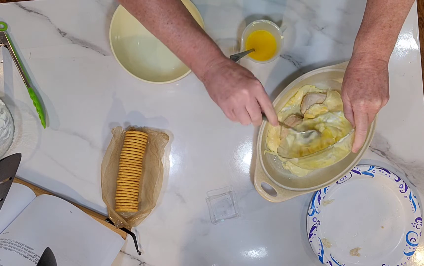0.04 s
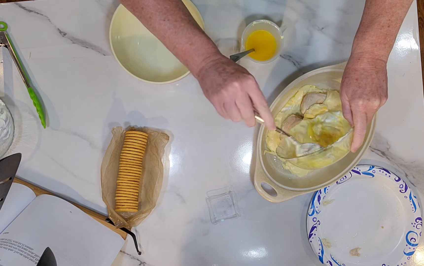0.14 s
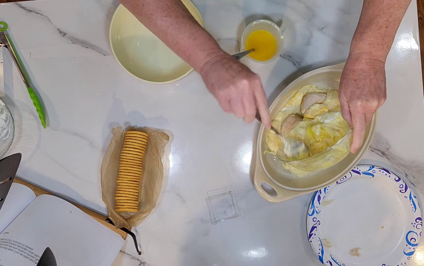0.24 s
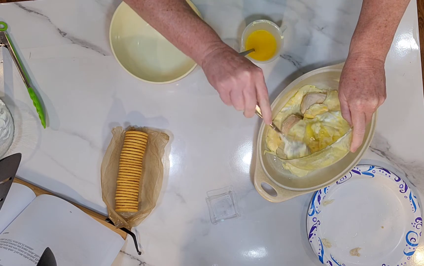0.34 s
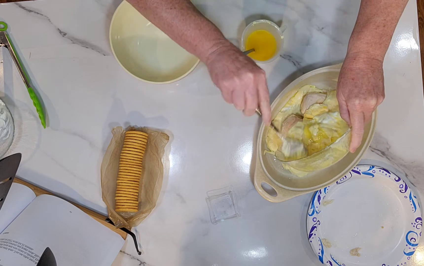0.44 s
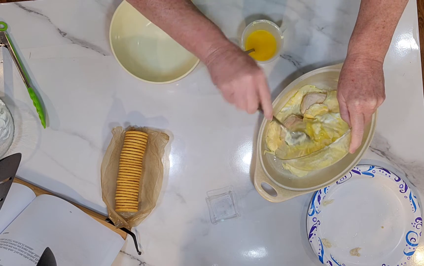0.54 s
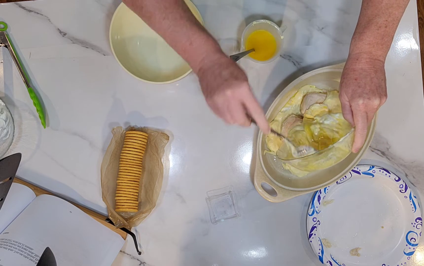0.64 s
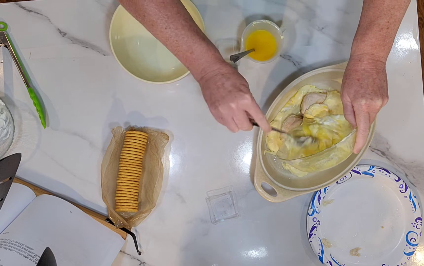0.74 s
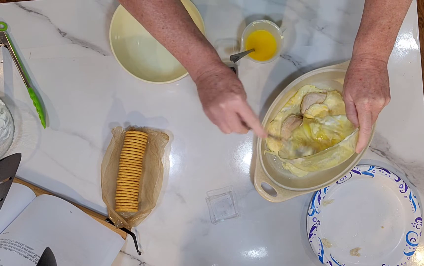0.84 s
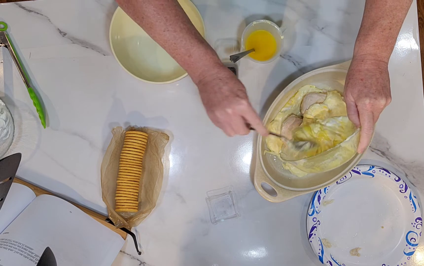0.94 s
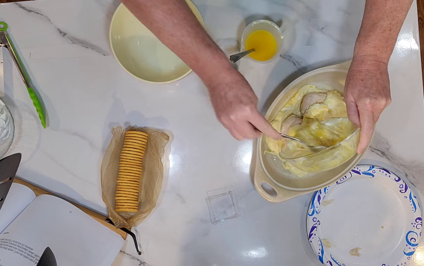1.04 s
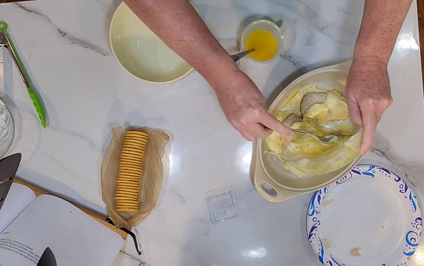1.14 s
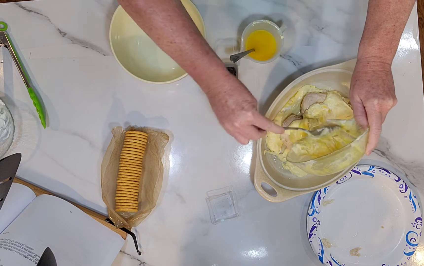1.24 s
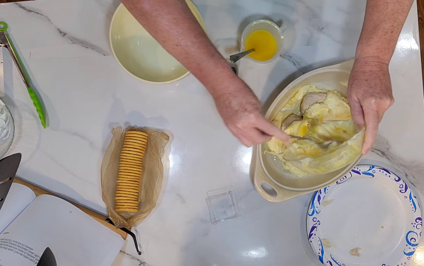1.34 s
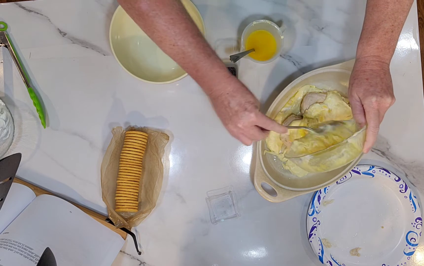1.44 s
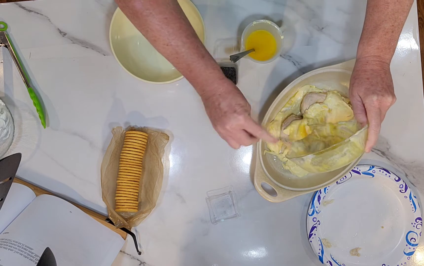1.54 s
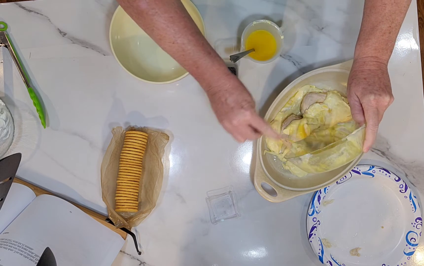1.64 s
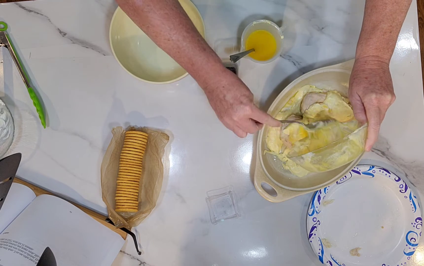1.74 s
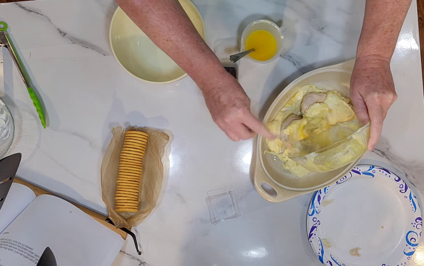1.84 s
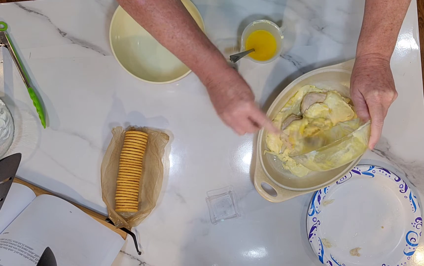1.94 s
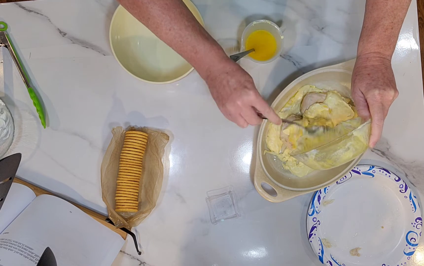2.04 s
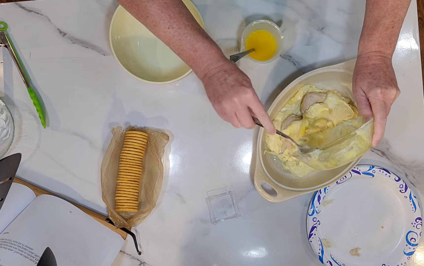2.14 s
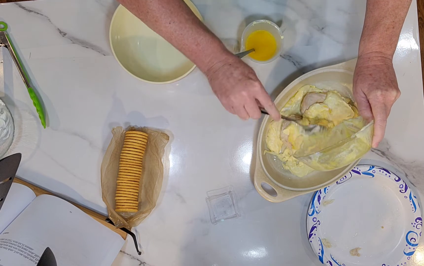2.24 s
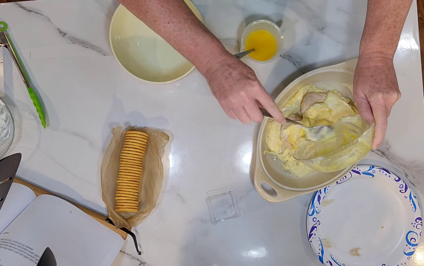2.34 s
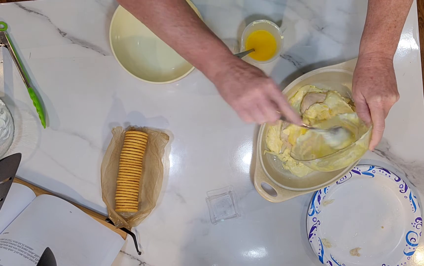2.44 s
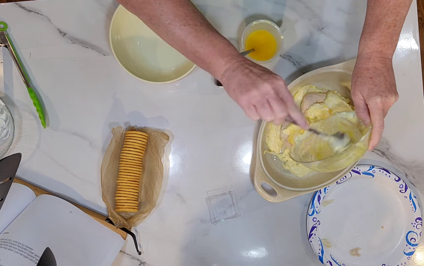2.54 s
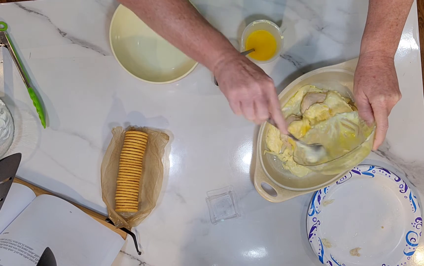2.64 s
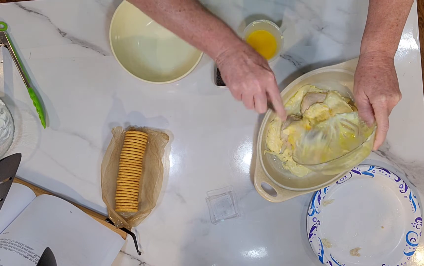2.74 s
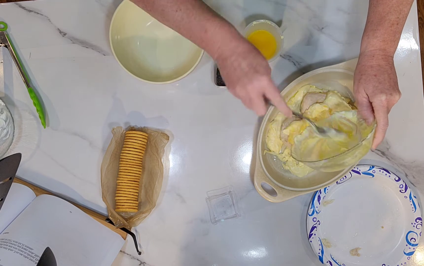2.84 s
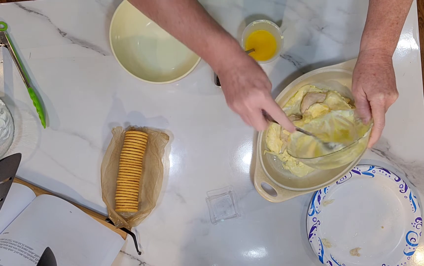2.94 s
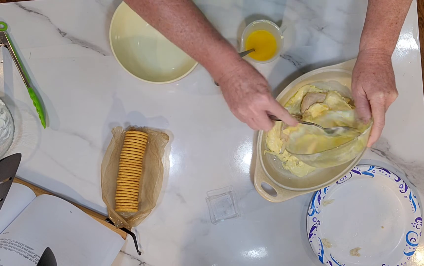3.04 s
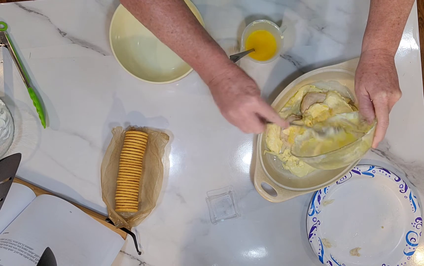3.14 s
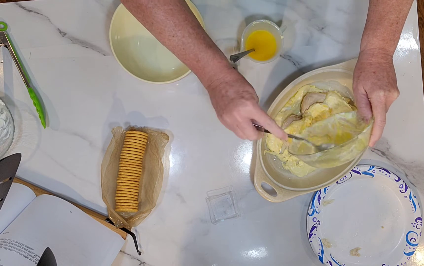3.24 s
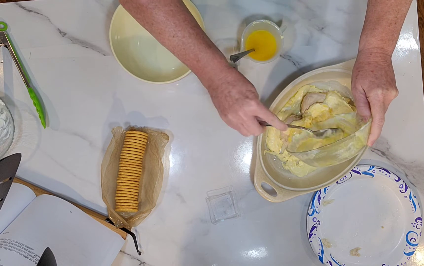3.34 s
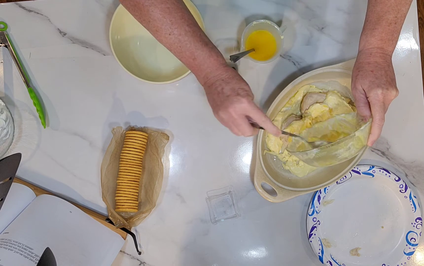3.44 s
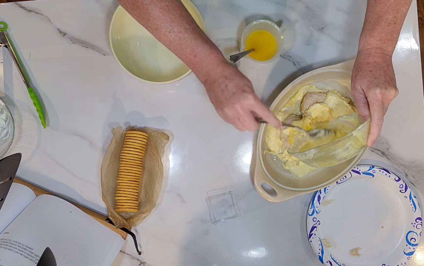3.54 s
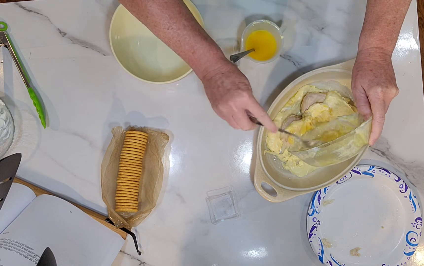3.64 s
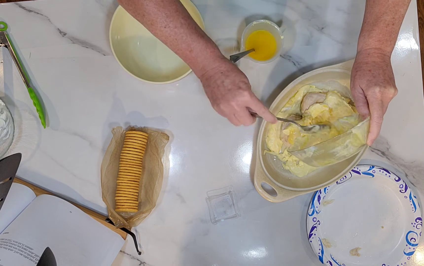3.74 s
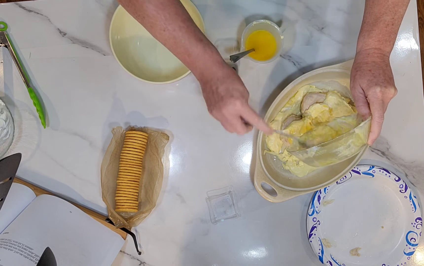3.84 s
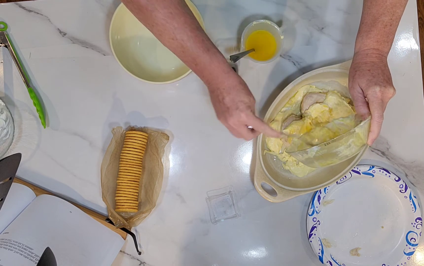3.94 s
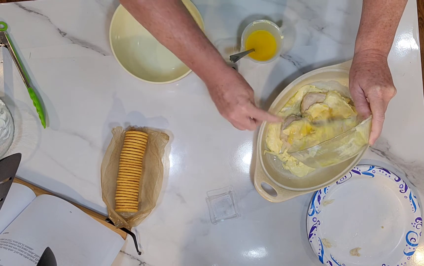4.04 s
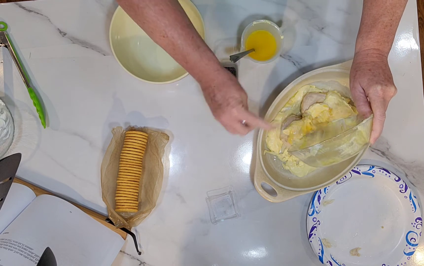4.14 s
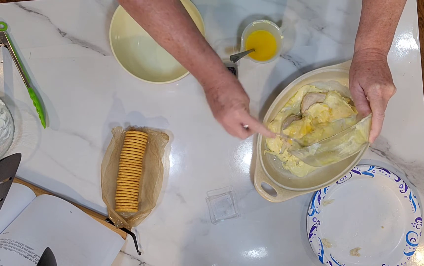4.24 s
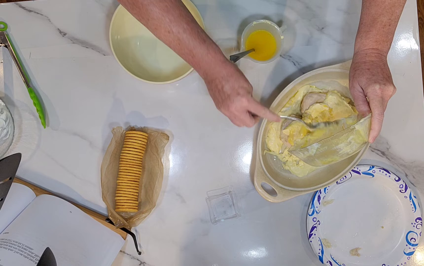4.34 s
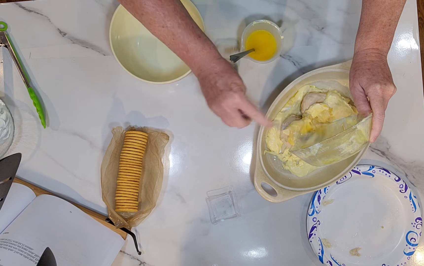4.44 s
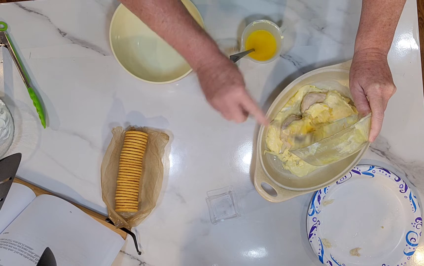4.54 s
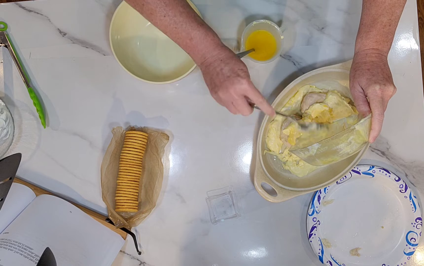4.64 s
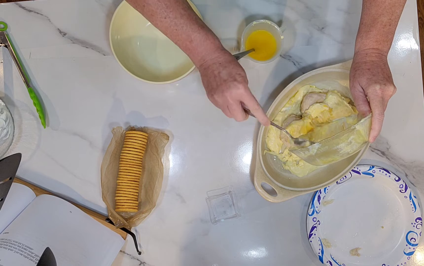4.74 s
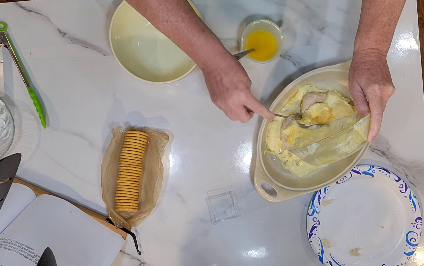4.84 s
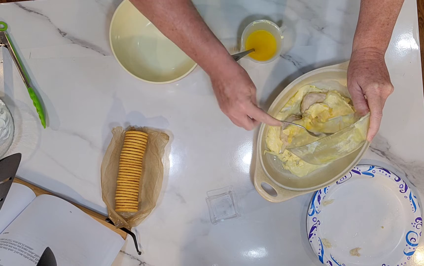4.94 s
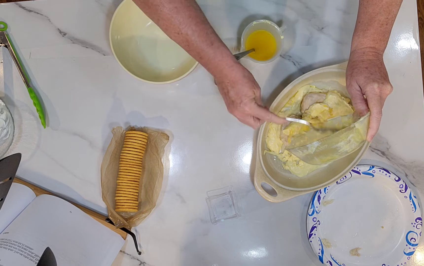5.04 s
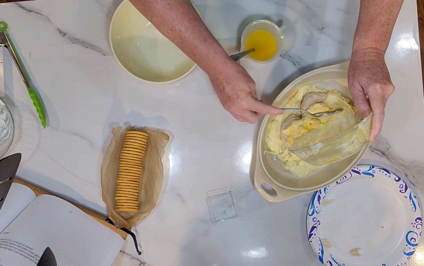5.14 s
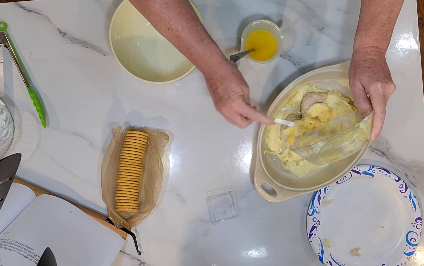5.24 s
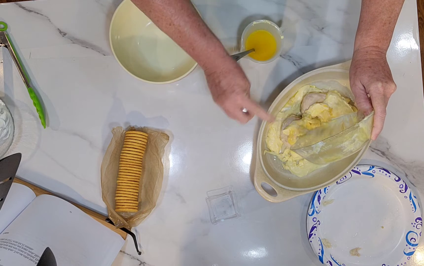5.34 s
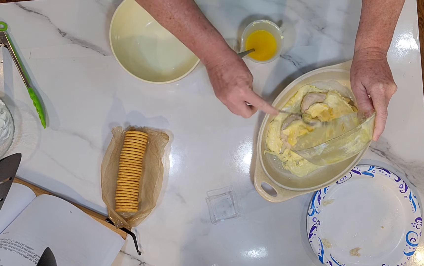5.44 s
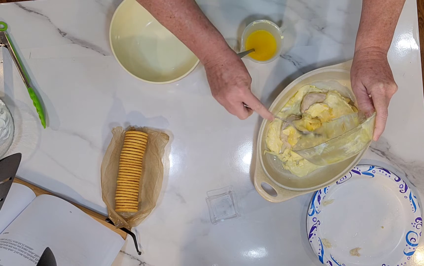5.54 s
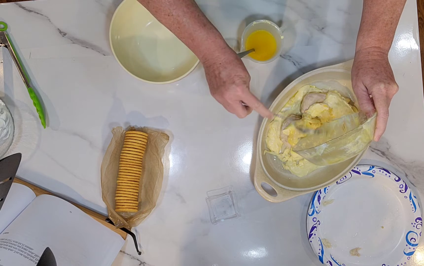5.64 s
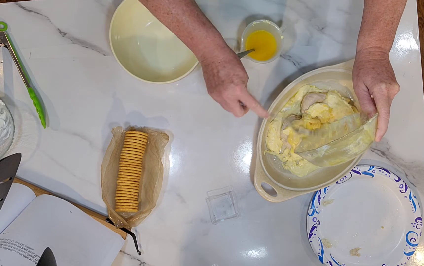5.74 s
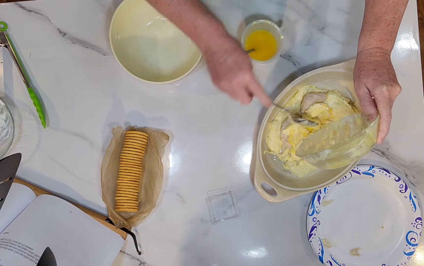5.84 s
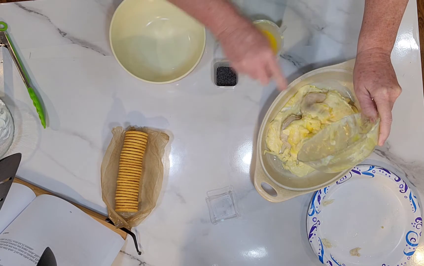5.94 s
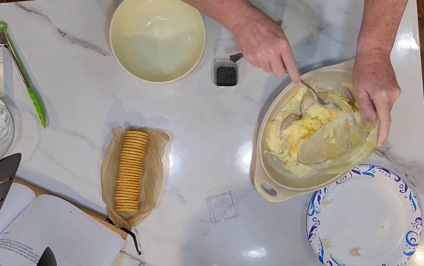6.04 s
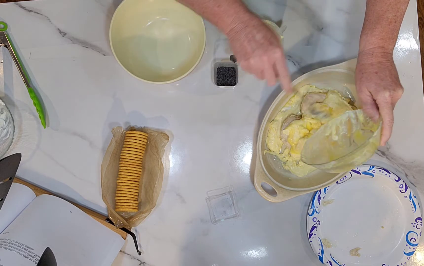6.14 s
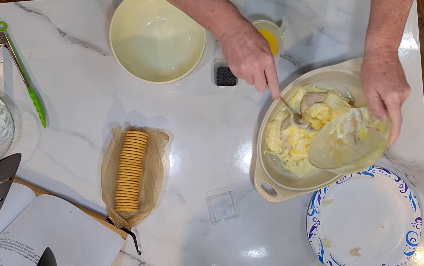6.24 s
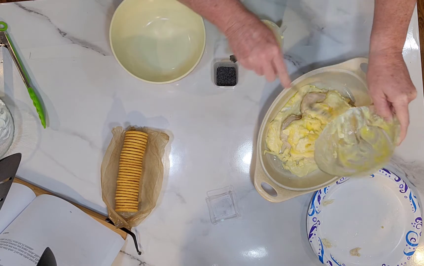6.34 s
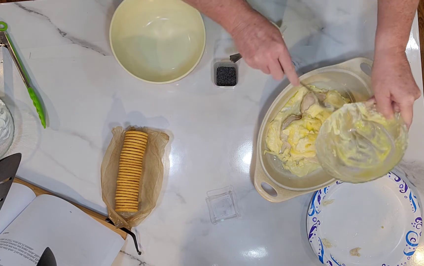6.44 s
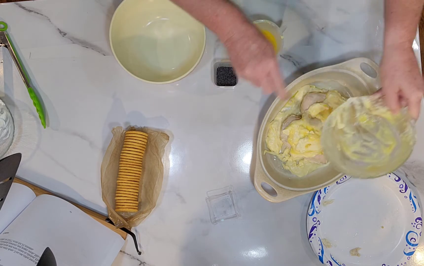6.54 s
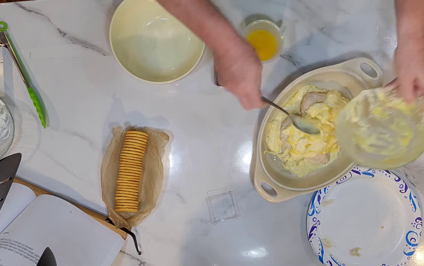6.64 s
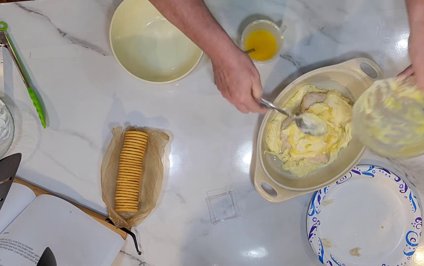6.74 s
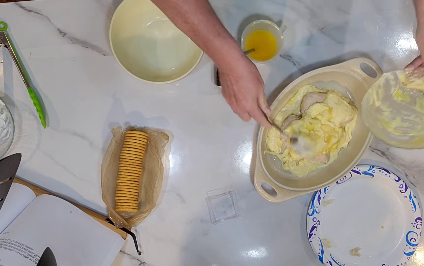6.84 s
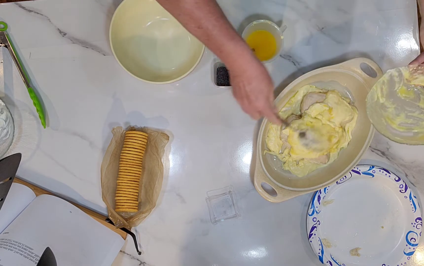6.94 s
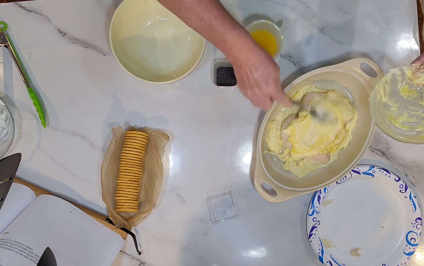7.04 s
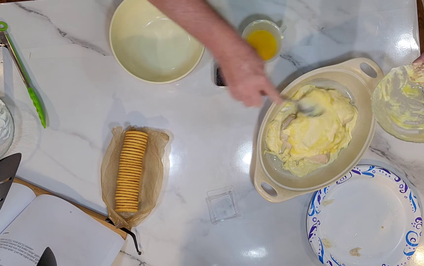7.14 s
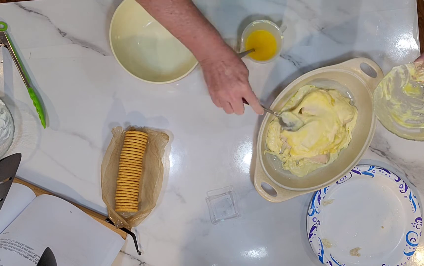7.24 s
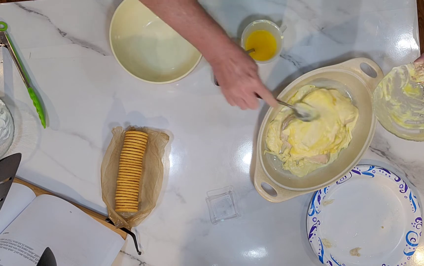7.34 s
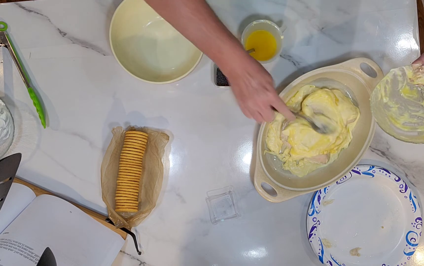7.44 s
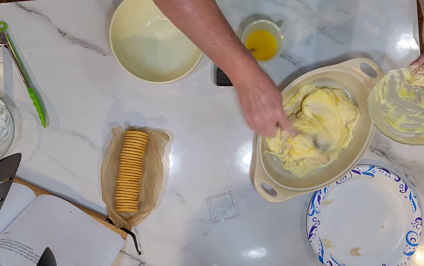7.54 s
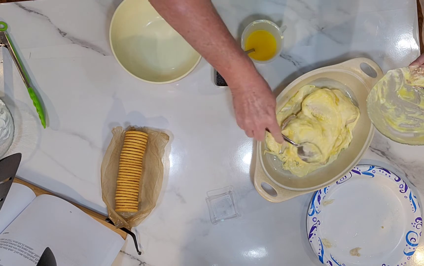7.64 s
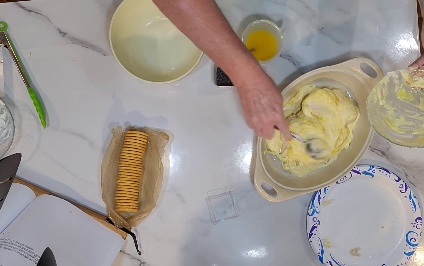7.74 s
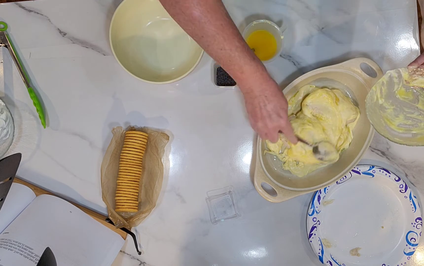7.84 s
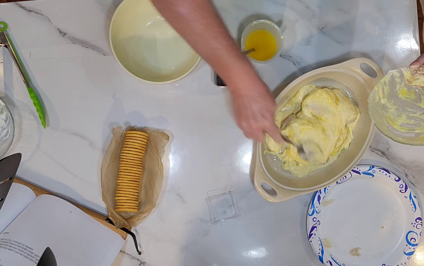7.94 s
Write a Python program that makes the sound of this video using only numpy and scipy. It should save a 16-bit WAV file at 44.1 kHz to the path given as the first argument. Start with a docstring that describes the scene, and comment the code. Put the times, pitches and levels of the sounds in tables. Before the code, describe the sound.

Quick, uneven clinks and light scrapes of a spoon in a glass bowl, ending with soft sticky sauce sounds.

```python
"""Clinks, chatter and gritty scrapes of a steel spoon in a tilted glass bowl; at the end, only sauce smacks.
Each contact is a burst of tiny blows ringing bowl and spoon, damped by thick sauce and spoon pressure.
Stick-slip grains drive the scrapes; sauce pops as it lets go of the spoon. The kitchen is small and hard,
with air noise and a far refrigerator hum. Two close microphone ports look down on the counter."""
import sys
import numpy as np
from scipy import signal
from scipy.fft import rfft, irfft, next_fast_len
from scipy.io import wavfile
from scipy.ndimage import map_coordinates

SR = 44100
rng = np.random.default_rng(int(sys.argv[2]) if len(sys.argv) > 2 else 0)


def put_to_file(sound):
    """Save the sound as 16-bit audio at rate SR, in the file named by the first command-line argument."""
    columns = np.atleast_2d(sound).T  # one column per channel
    safe = np.clip(columns, -1, 1)
    whole_steps = np.round(safe * 32767)
    wavfile.write(sys.argv[1], SR, whole_steps.astype(np.int16))


N = 352174

# Air noise spectrum. Each row: frequency in Hz, relative density in dB.
AIR_SPECTRUM_DB = [(18, -43), (30, -16.5), (71, -4), (145, -18.5), (374, -16), (721, -26.5), (801, -25),
                   (1430, -31), (1540, -34.5), (1720, -28), (16000, -52.5)]
# Air noise likeness between ports. Each row: frequency in Hz, left-right correlation.
AIR_CORRELATION = [(60, 0.93), (180, 0.92), (550, 0.82), (1650, -0.46), (4970, -0.69), (15000, 0.57)]
# Refrigerator partials. Each row: frequency in Hz, level in dB.
HUM_PARTIALS = [(60, -69.5), (120, -66.5)]
# Kitchen decay. Each row: frequency in Hz, T60 in seconds.
KITCHEN_T60_S = [(500, 0.18), (1500, 0.21), (4000, 0.27), (10000, 0.24)]
# Port phase difference. Each row: frequency in Hz, left minus right in radians.
PORT_PHASE_RAD = [(300, -3.3), (1200, -0.65), (3700, -1.27), (8000, -1.53), (15000, -1.7)]
# Port level difference. Each row: frequency in Hz, left minus right in dB.
PORT_BALANCE_DB = [(500, -2), (2000, -0.7), (5000, -1.5), (9000, 1), (15000, 2.5)]
# Sauce letting go. Each row: start in seconds, level in dB, 5 kHz weight in dB, 12 kHz weight in dB.
SMACKS = [(0.3086, -23.5, -13, -22), (1.8101, -44, -13, -6), (1.8687, -47, -1, -19.5),
          (6.9134, -31.5, -22, -12.5), (7.0788, -30.5, -3, -15.5), (7.3826, -46, -16.5, -4),
          (7.5029, -45.5, -12, -19), (7.5442, -45, 4, -14), (7.565, -50, -24, -15.5)]
# Sauce-damped glass bowl. Each row: mode frequency in Hz, level in dB, T60 in seconds.
BOWL_MODES = [(870, -13.5, 0.14), (958, 12, 0.079), (1069, 5.5, 0.037), (1522, -6.5, 0.17),
              (1695, -3.5, 0.16), (2050, -12.5, 0.066), (2124, -2.5, 0.088), (2286, -7.5, 0.18),
              (2511, -18.5, .09), (2849, -3, 0.14), (3130, -6, 0.3), (3470, 2, 0.086), (4226, -4.5, 0.69),
              (4706, -1.5, 0.025), (5090, -3, 0.16), (5490, 1, 0.098), (5870, 0.5, 0.45), (6060, -6.5, 0.3),
              (6860, 0.5, 0.22), (7685, -1, 0.25), (8330, -9, 0.12), (9130, 7.5, 0.1), (10510, -10.5, 0.12),
              (10120, 4.5, 0.13), (12080, 3, 0.066), (12900, 4, 0.11), (12407, 2.5, 0.057),
              (14300, -0.5, .05), (15500, -7, .04)]
# Soft scrapes. Each row: middle in seconds, length in seconds, bowl, spoon and rasp levels in dB.
SCRAPES = [(.04, 0.18, -52.5, -55, -65), (0.527, .06, -59, -83, -57), (1.043, 0.14, -66, -56, -49),
           (1.31, 0.22, -59.5, -56, -60), (1.73, 0.046, -64, -64, -79), (1.872, 0.11, -57, -58, -63),
           (2.323, 0.036, -53, -53, -41), (2.381, 0.035, -33, -62, -67), (2.83, 0.081, -57, -74, -55.5),
           (2.912, .07, -59, -66, -66), (3.177, 0.2, -53, -46.5, -80), (3.586, 0.24, -81, -57, -65),
           (3.859, 0.078, -43, -34.5, -41), (4.03, 0.085, -54, -57, -57), (4.187, 0.17, -63, -78, -53.5),
           (4.464, 0.19, -50.5, -66, -52), (4.896, 0.077, -56, -72, -57), (5.17, 0.16, -70, -61, -59),
           (5.272, .08, -58, -65, -51.5), (5.722, 0.044, -62, -54, -47), (5.885, .05, -52, -47, -48)]
# Slide after a contact: bowl, spoon and rasp offsets in dB from that contact's bowl, ring and edge levels.
SLIDE_OFFSETS_DB = [-35.5, -31, -34.5]
# Contact colour breakpoints in Hz: low thud, thud, body, clink, edge.
COLOUR_HZ = [600, 900, 2200, 5800, 11000]
# Spoon on bowl. Each row: time in seconds, level in dB, spoon ring in Hz, relative ring, thud, clink
# and edge levels in dB, pressure damping in 1/s, left minus right in dB, favoured body and clink in Hz.
CONTACTS = [(0.0004, -49, 3530, 5.5, -22, -6, -18, 12, -3, 2850, 4670),
            (0.0734, -39.5, 3700, 3, -18, -4.5, -5.5, 22, -0.5, 1670, 5680),
            (0.1404, -60.5, 3692, 22, -34, 4, -3, 9.2, 1.5, 3100, 5000),
            (0.1555, -56, 3780, 16, -20, -3, -1.5, 15, 4, 3220, 5150),
            (0.3536, -29.5, 3600, -11, -14, -3, -10, 19, 2, 3070, 6200),
            (0.4119, -28, 3636, -0.5, -13, 1, -7, 23, 1.5, 2100, 4590),
            (0.5327, -28, 3690, -0.5, -23, 5, -2, 28, 5.5, 3280, 5360),
            (0.6312, -31, 3665, -10.5, -5.5, -7.5, -30, 16, 1, 2700, 5300),
            (0.853, -29, 3656, 11, -15, 1.5, -6.5, 24, 1.5, 3240, 5770),
            (0.8574, -33, 3400, -4, -13.5, -6.5, -4.5, 14, -0.5, 3100, 6750),
            (0.9131, -13.5, 3970, -8.5, -19.5, -5, -15.5, 30, 3, 2230, 5200),
            (1.0318, -35, 3710, 11, -8, -14, -8.5, 21, -0.5, 3330, 6900),
            (1.0874, -24, 3850, -5.5, -7.5, -1.5, -5, 20, 0.5, 1590, 7110),
            (1.2226, -45.5, 3890, 13, -10, -9.5, -13, 29, 2, 3170, 5020),
            (1.5433, -24, 3760, 8, -10, -6.5, -6, 21, 4, 1646, 7000),
            (1.5548, -36.5, 4145, 7, -9, -3, -13, 16, -13.5, 2170, 4730),
            (1.6264, -54, 3945, 20.5, -19, -14, -19.5, 15, 0, 1910, 4740),
            (1.7474, -47, 3730, 5, -18, -4, -15.5, 14, 2.5, 2290, 4440),
            (1.8877, -48, 3500, -13.5, -32, -10, -10.5, 12, -0.5, 2150, 5660),
            (2.0493, -25.5, 3900, 6, -13.5, -1.5, -9, 18, 1.5, 1980, 5300),
            (2.085, -27.5, 3780, -7, -13.5, -11.5, -17.5, 6.4, 1, 2820, 6200),
            (2.1164, -32, 3730, 0, -2.5, -20, -25, 35, 0, 3250, 4470),
            (2.1265, -33.5, 3820, -1, -18, -8, -19.5, 5.5, 1.5, 2270, 4730),
            (2.3188, -19.5, 3754, -10.5, -19, -5, -9.5, 24, 0.5, 3350, 6100),
            (2.3875, -28, 4000, -11, -18, -12, -22, 12, 1.0, 2130, 4840),
            (2.4069, -26, 4030, -18, -28.5, -9, -23, 15, -2, 2166, 5250),
            (2.6727, -26.5, 3910, 5.5, -35, -14, -4, 13, 2.5, 2020, 5260),
            (2.681, -59, 3860, 10, -22, -6, 8, 19, 3, 2780, 4600),
            (2.7571, -45.5, 3870, -4, -7, 5.5, -12, 15, 1, 3280, 4580),
            (2.8391, -37, 3970, -1, -12.5, -2, -28, 7.7, 1, 2100, 5700),
            (2.8656, -30, 4000, -13, -52, -20, -32, 6.8, 0, 2770, 5800),
            (2.8942, -29, 3880, -12.5, -49, -19, -32, 5, -0.5, 2250, 4510),
            (2.9143, -34, 3830, -19, -47, -27, -35, 7.9, -11, 2280, 6840),
            (3.1123, -22, 3860, -5.5, -19, -10.5, -11, 25, 2.5, 1850, 5140),
            (3.2037, -54, 3840, 7, -11.5, -5, -4, 18, -3, 3300, 6240),
            (3.3978, -30, 3807, 7, -6, 4, 0, 25, 2.5, 3250, 7040),
            (3.4715, -45.5, 3800, -2, -7, 6.5, -13, 13, 1.5, 2720, 6800),
            (3.618, -30, 3906, 4.5, -9.5, -5, -10, 31, 1.5, 2610, 6900),
            (3.681, -15.5, 3830, -15.5, -15.5, -4, -9.5, 31, 2.5, 2825, 5460),
            (3.8525, -17.5, 3695, -8, -6.5, -0.5, -7, 29, -0.5, 1580, 5940),
            (4.0442, -29, 3763, 5.5, -16, -7, -10, 23, 3, 2000, 6900),
            (4.366, -23, 3730, -5, -11, -9.5, -9.5, 45, 3, 2700, 5830),
            (4.4588, -44.5, 3670, -12, -2, -7, -31, 16, -1, 3230, 5550),
            (4.6491, -20.5, 3760, -4.5, -18.5, -3.5, -8, 31, 2, 1700, 7700),
            (4.7262, -33, 3990, -9, -14, 3, -20, 9.5, -0.5, 2340, 6080),
            (4.7329, -28.5, 3825, -10, -18, -5, -21, 10, 3, 2220, 4730),
            (4.7488, -28.5, 3930, -17, -15.5, -10, -14.5, 19, -3, 2220, 5700),
            (4.9167, -24.5, 3900, -12, -14, -2, -6.5, 22, 0.0, 1730, 5900),
            (4.9607, -28.5, 4000, -11, -11, -8, -17.5, 11, 4, 2280, 4830),
            (4.9756, -23.5, 3880, -15, -16, -4, -16.5, 12, 1.5, 2290, 7720),
            (5.1721, -23.5, 4062, -5, -18, -4.5, -6, 16, 2.5, 2380, 5100),
            (5.4674, -23, 3970, -17.5, -6.5, 0, -5.5, 17, 2, 3050, 5980),
            (5.5207, -32.5, 3990, -8, -6, 0.5, -11, 11, 0, 3390, 6200),
            (5.5498, -31, 3960, -18.5, -28, -15, -19, 7.1, -4.5, 2840, 5830),
            (5.7207, -17.5, 3980, -12.5, -10, 0, -9, 19, 0, 3200, 5750),
            (5.8944, -22.5, 3720, -12.5, -10.5, 1, -5, 20, 1, 3210, 5670),
            (6.2752, -30.5, 3910, -1.5, -8.5, -0.5, 5, 15, 2, 2885, 6120),
            (6.337, -37, 3900, -6, -13, -3, -10.5, 15, 3, 2100, 4850),
            (6.356, -37, 3983, 1, -7.5, -6.5, -5.5, 11, 1.5, 2040, 6000),
            (6.6363, -22, 3570, -12, -11.5, 1, -1, 27, 2, 3140, 6910),
            (6.6892, -28.5, 3650, -11.5, -7, -1.5, -9.5, 24, -1, 1680, 5860)]

AIR_DB, TOP_HZ = -58, 16979
SLIDE_RISE_S, SLIDE_FADE_S = .04, 0.23
CHATTER_S, MODE_SCATTER_DB, FAVOURED_WIDTH = .0022, 2.8, .045  # width as a share of pitch
LINGER_DB, EMPTYING_DB_PER_S = -46, 4.5  # ring escaping the spoon's damping; grows as the sauce leaves
LINGER_BLUR_HZ = 25  # clinging sauce unsettles the lingering pitch


def amp(db):
    """dB to gain."""
    return 10 ** (np.asarray(db) / 20)


def unit_rms(x):
    """Scale to rms 1."""
    return x / np.sqrt(np.mean(x ** 2) + 1e-20)


def along(points, hz):
    """Interpolate (Hz, value) points on a log axis."""
    knots_hz, values = np.transpose(points)
    return np.interp(np.log(hz + 1), np.log(knots_hz + 1), values)


def wobble(rate_hz):
    """Smooth random curve through rate_hz knots a second."""
    return map_coordinates(rng.standard_normal(int(N * rate_hz / SR) + 4), [np.arange(N) * rate_hz / SR])


def filtered(x, response):
    """Apply a complex frequency response."""
    size = next_fast_len(N + SR // 2)
    return irfft(rfft(x, size) * response(np.fft.rfftfreq(size, 1 / SR)), size)[..., :N]


def ringing(t, hz, db, t60_s, blur_hz=0):
    """Sum of decaying sines; blur random-walks each phase."""
    phase = 2 * np.pi * hz[:, None] * t
    if blur_hz:
        phase += np.cumsum(rng.standard_normal(phase.shape), axis=1) * np.sqrt(2 * np.pi * blur_hz / SR)
    return np.sum(amp(db[:, None] - 60 * t / t60_s[:, None]) * np.sin(phase), axis=0)


def add(track, start_s, sound):
    """Mix a sound into the track."""
    track[..., round(start_s * SR):][..., :sound.shape[-1]] += sound


def air_noise():
    """Steady room air, near mono in the bass."""
    def mid_side_gains(hz):
        angle = np.arccos(np.clip(along(AIR_CORRELATION, hz), -1, 1)) / 2
        return amp(along(AIR_SPECTRUM_DB, hz)) * [np.cos(angle), np.sin(angle)]
    mid, side = filtered(rng.standard_normal((2, N)), mid_side_gains)
    return amp(AIR_DB) * unit_rms(np.array([mid + side, mid - side]))


def refrigerator():
    """Far mains hum, wavering in level and phase."""
    t = np.arange(N) / SR
    return sum(np.sqrt(2) * amp(db + 0.57 * wobble(1.4)) * np.sin(2 * np.pi * hz * t + 0.59 * wobble(4))
               for hz, db in HUM_PARTIALS)


def kitchen(sound, wet_db, pan_db=0):
    """Direct sound on both ports plus a fresh diffuse tail with frequency-dependent decay."""
    hz, t, spectra = signal.stft(rng.standard_normal((2, SR // 2)), SR, nperseg=256)
    tail = signal.istft(spectra * amp(-60 * t / along(KITCHEN_T60_S, hz)[:, None]), SR, nperseg=256)[1]
    delayed = np.pad(sound, (130, 0))
    out = amp(wet_db) * signal.fftconvolve(delayed[None], tail / np.linalg.norm(tail[0]), axes=1)
    out[:, :len(sound)] += sound * amp([[pan_db / 2], [-pan_db / 2]])
    return out


def sauce_smacks():
    """Sticky sauce pops off the spoon: one thin bright click each time."""
    out, t = np.zeros((2, N + SR)), np.arange(256) / SR
    hz = np.fft.rfftfreq(len(t), 1 / SR)
    for start_s, level_db, low_db, high_db in SMACKS:
        spectrum = amp(along([(2500, low_db - 24), (5000, low_db), (12000, high_db)], hz))
        burst = rng.standard_normal(len(t)) * amp(-60 * np.abs(t - .002) / 0.00046)
        pop = irfft(rfft(burst) * spectrum)
        add(out, start_s, kitchen(amp(level_db) * pop / np.abs(pop).max(), wet_db=-3))
    return out[:, :N]


def drag_gains():
    """Bowl, spoon and rasp gains: the edge slides on and lifts after each contact; each scrape is a hump."""
    t, power = np.arange(N) / SR, np.zeros((3, N))
    for time_s, level_db, _, ring_db, _, _, edge_db, *_ in CONTACTS:
        after_s = np.maximum(t - time_s, 0)
        swell = (1 - np.exp(-after_s / SLIDE_RISE_S)) * np.exp(-(after_s / SLIDE_FADE_S) ** 2)
        power += (amp(level_db + np.add(SLIDE_OFFSETS_DB, [0, ring_db, edge_db]))[:, None] * swell) ** 2
    for middle_s, length_s, *levels_db in SCRAPES:
        hump = np.exp(-2 * ((t - middle_s) / (length_s / 2)) ** 2)
        power += (amp(levels_db)[:, None] * hump) ** 2
    return np.sqrt(power)


def spoon_drag():
    """Stick-slip grains drive the edge-damped bowl modes, the spoon's ring and a broad rasp."""
    t = np.arange(SR // 8) / SR
    bowl_hz, bowl_db, bowl_t60_s = np.transpose(BOWL_MODES)
    grit = rng.standard_normal((3, 2, N)) * amp(3 * wobble(90) + 2.5 * wobble(300))
    grit = 1.2 * grit[:, :1] + 0.34 * grit  # mostly common to both ports
    bowl = ringing(t, bowl_hz, bowl_db - 9 * np.abs(np.log2(bowl_hz / 2200)), 0.1 * bowl_t60_s)
    spoon = ringing(t, np.array([3890, 3700]), np.array([0, -6]), np.array([.09, .05]))
    rasp = ringing(t, np.array([5800, 9500, 13500]), np.array([0, -3, -4]), np.array([.0015, .001, .001]))
    return sum(gain * unit_rms(signal.fftconvolve(grains, body[None], axes=1)[:, :N])
               for gain, grains, body in zip(drag_gains(), grit, [bowl, spoon, rasp]))


def chatter(t):
    """Tiny blows as a contact builds up and lets go; whitened, unit energy."""
    age = t / CHATTER_S
    blows = rng.standard_normal(len(t)) ** 3 * age * np.exp(-age)
    whitened = irfft(np.exp(1j * np.angle(rfft(blows))), len(t)) * np.exp(-age / 4)
    return whitened / np.linalg.norm(whitened)


def clack(t, colour_db):
    """Countless small modes blur into fast-dying noise."""
    spectrum = amp(along(colour_db, np.fft.rfftfreq(len(t), 1 / SR)))
    noise = irfft(rfft(rng.standard_normal(len(t))) * spectrum, len(t))
    return (amp(9.5 - 60 * t / 0.034) + amp(17.5 - 60 * t / 0.0026)) * noise


def spoon_contacts():
    """Chatter rings bowl and spoon; where it lands sets which modes speak, pressure damps them."""
    out, t = np.zeros((2, N + SR)), np.arange(SR // 4) / SR
    chatter_t = t[:SR // 20]
    bowl_hz, bowl_db, bowl_t60_s = np.transpose(BOWL_MODES)
    t60_s = np.append(bowl_t60_s, [.3, .06])  # bowl modes, then two spoon modes
    for (time_s, level_db, ring_hz, ring_db, thud_db, clink_db, edge_db,
         damping_per_s, pan_db, *favoured_hz) in CONTACTS:
        colour_db = list(zip(COLOUR_HZ, [thud_db - 6.5, thud_db + 9, 0, clink_db, edge_db]))
        detune = 1 + 0.0073 * rng.standard_normal(len(bowl_hz))
        scatter_db = rng.normal(0, MODE_SCATTER_DB, len(bowl_hz))
        hz = np.append(bowl_hz * detune, [ring_hz, .96 * ring_hz])
        db = np.append(bowl_db + along(colour_db, bowl_hz) + scatter_db, [ring_db + 14, ring_db - 2])
        # boost modes with an antinode at the contact
        db += 8 * sum(np.exp(-(np.log(hz / centre_hz) / FAVOURED_WIDTH) ** 2) for centre_hz in favoured_hz)
        blows = chatter(chatter_t)
        drive = np.abs(np.exp(-2j * np.pi * hz[:, None] * chatter_t) @ blows)
        db -= 20 * np.log10(np.maximum(drive, .5))  # even out the chatter's drive per mode
        pressed = ringing(t, hz, db, 1 / (1 / t60_s + damping_per_s))
        lingering = ringing(t, hz, db + LINGER_DB + EMPTYING_DB_PER_S * time_s, t60_s, LINGER_BLUR_HZ)
        strike = amp(level_db - 7) * signal.fftconvolve(pressed + lingering + clack(t, colour_db), blows)
        add(out, max(time_s - CHATTER_S / 2, 0), kitchen(strike, wet_db=-4.5, pan_db=pan_db))
    return out[:, :N]


def scene():
    """Spoon and sauce over the background; the small bowl radiates no bass and meets the ports unequally."""
    def bowl_to_ports(hz):
        half = np.array([[.5], [-.5]])
        highpass = (1j * hz / (700 + 1j * hz)) ** 4
        balance = amp(along(PORT_BALANCE_DB, hz) * half)
        return highpass * balance * np.exp(1j * along(PORT_PHASE_RAD, hz) * half)
    near = spoon_contacts() + spoon_drag() + sauce_smacks()
    background = (air_noise() + refrigerator()) * amp([[-.6], [.6]])
    return filtered(near, bowl_to_ports) + background


def record(dry):
    """3 dB down overall, steep roll-off from 15 kHz, nothing above TOP_HZ."""
    rolloff_db = [(15000, -3), (16200, -21), (16900, -28.5)]
    return filtered(dry, lambda hz: amp(along(rolloff_db, hz)) * (hz < TOP_HZ))


dry = scene()
out = record(dry)
put_to_file(out)
```